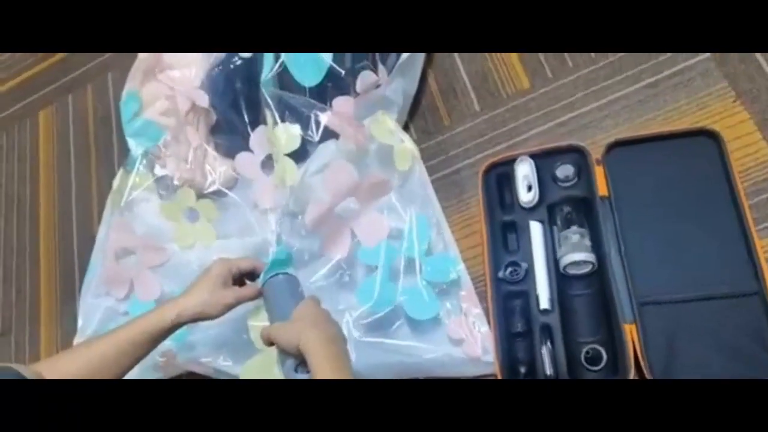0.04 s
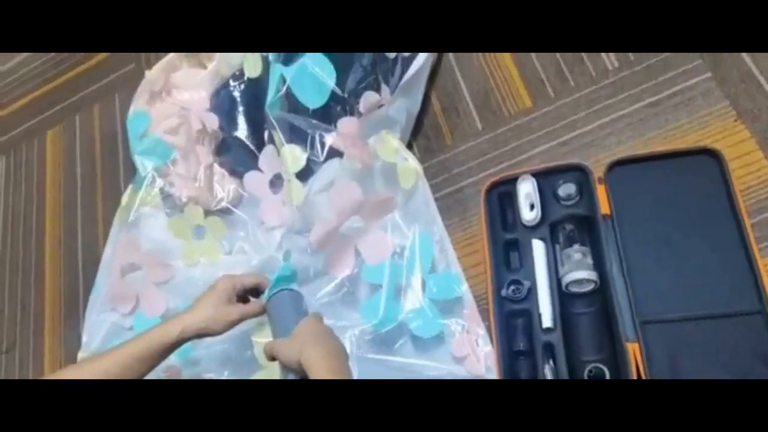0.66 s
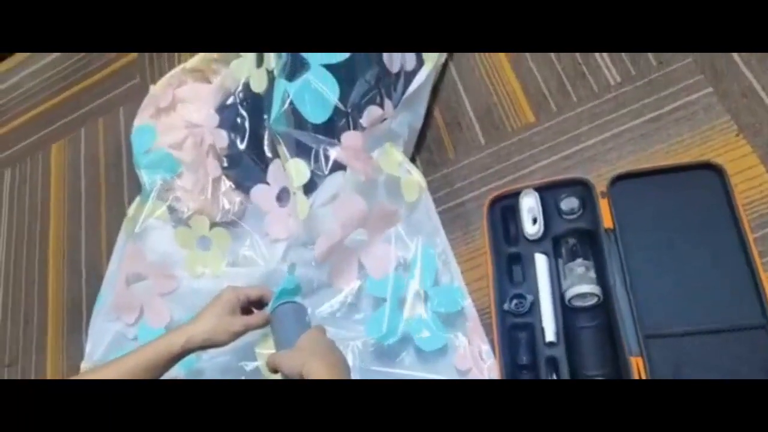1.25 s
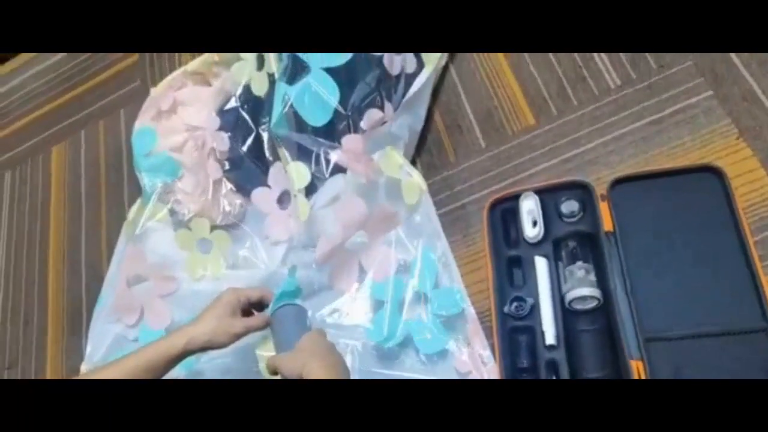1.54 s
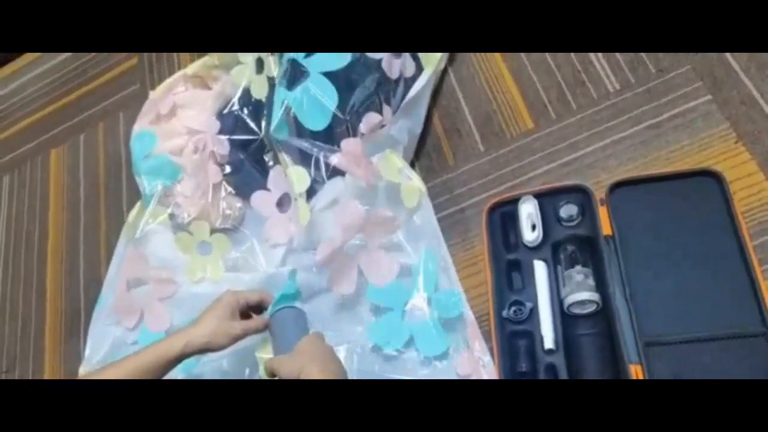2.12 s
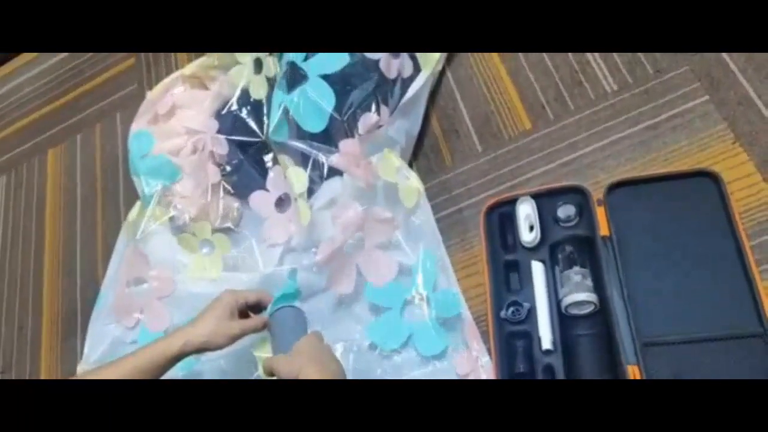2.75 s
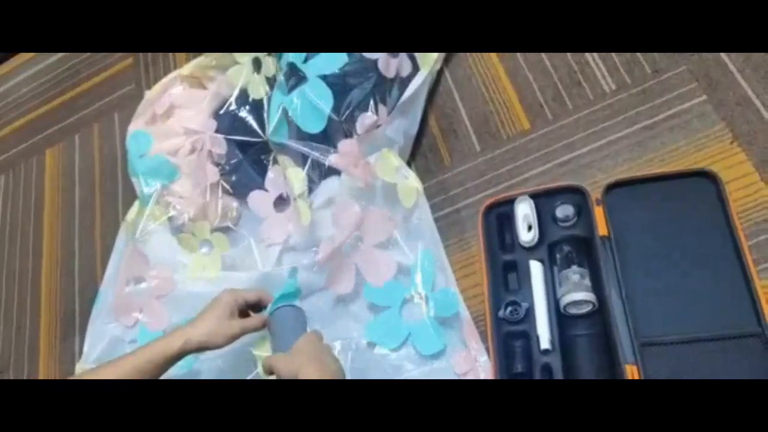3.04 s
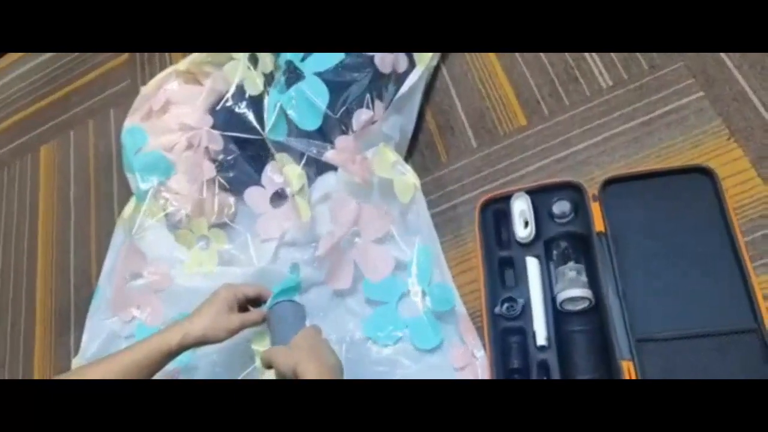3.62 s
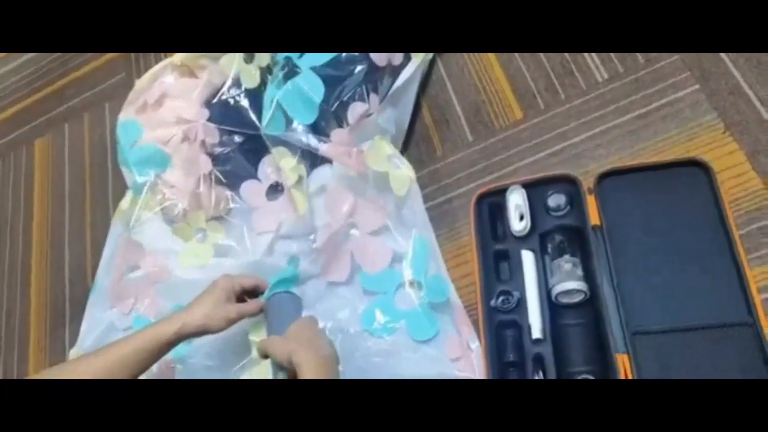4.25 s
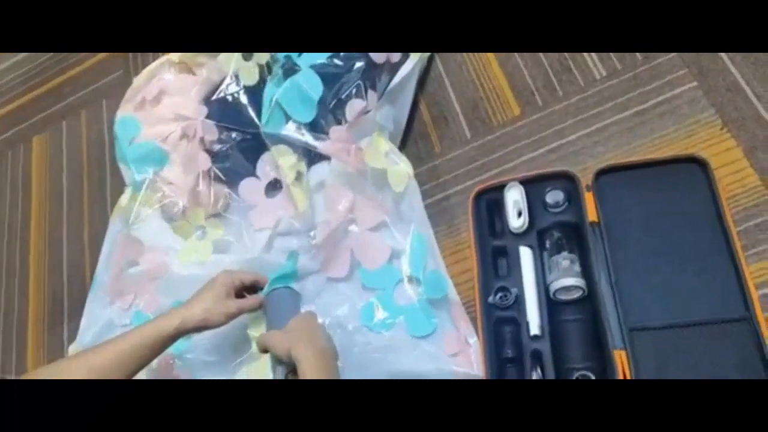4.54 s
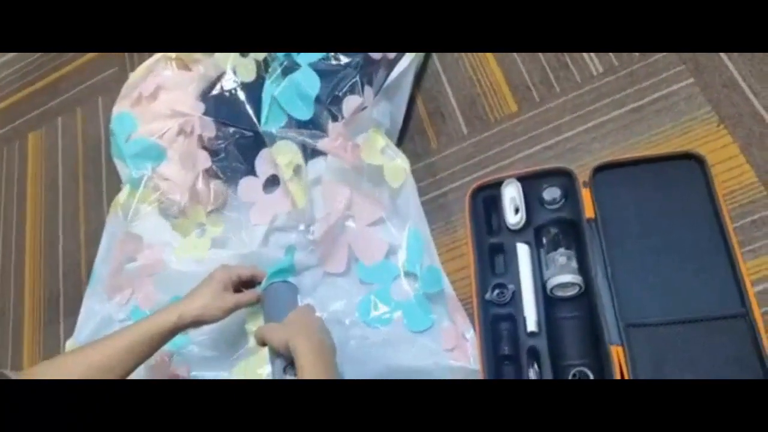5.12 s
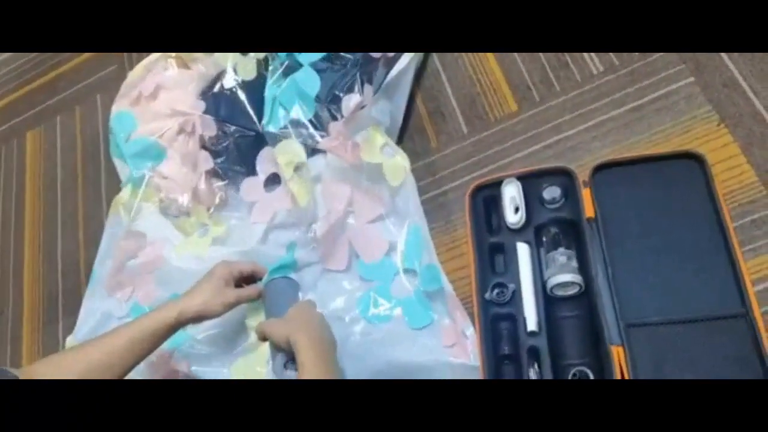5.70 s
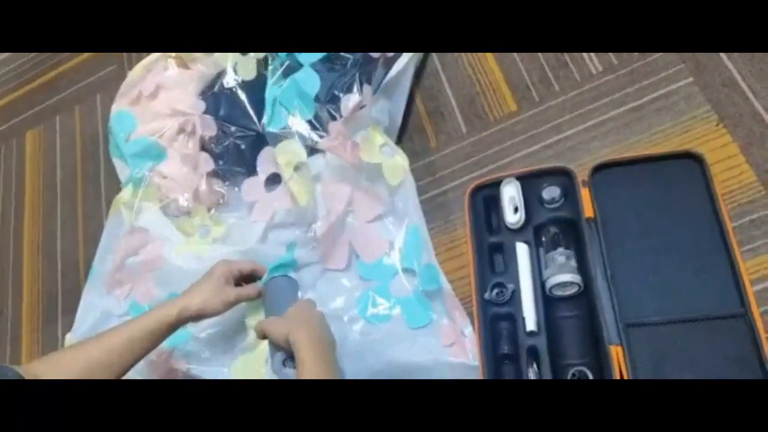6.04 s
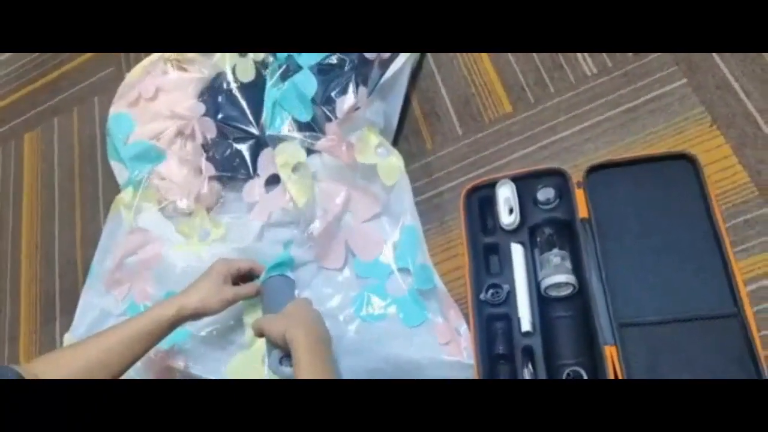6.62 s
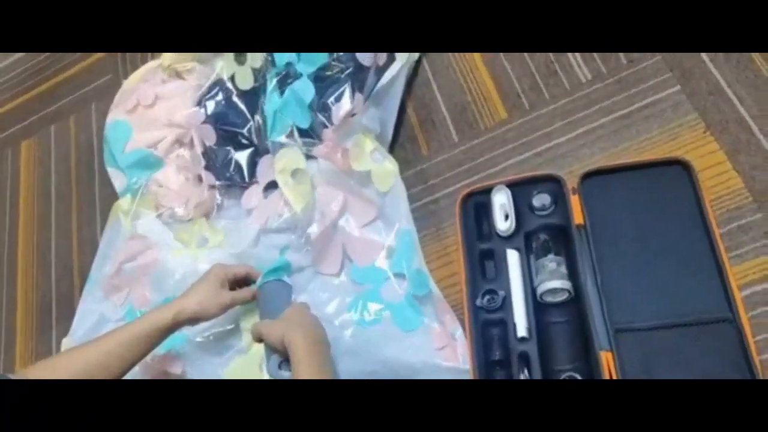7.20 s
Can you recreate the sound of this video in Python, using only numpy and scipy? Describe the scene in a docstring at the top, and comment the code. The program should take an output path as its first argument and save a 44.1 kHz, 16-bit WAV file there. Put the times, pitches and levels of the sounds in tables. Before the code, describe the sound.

A handheld electric vacuum pump runs throughout, drawing air from a plastic storage bag with a bright hiss and a steady rush. A raspy leak at the nozzle fades after about two seconds, while a high motor whine grows and then holds, easing slightly near the end. The hiss shifts subtly in colour. It is heard close up indoors, over a faint rumble and a soft hand bump midway.

```python
"""A bright hiss and a rush of air: a handheld electric pump is emptying a plastic storage bag on carpet.
Air hisses through the bag's valve and rushes out of the pump, whose fan turns about 600 times a second.
As the nozzle seals, a raspy leak fades and the whine of a ball bearing grows.
Close echoes colour the hiss as the grip shifts. Mains hum, a low rumble and soft bumps lie underneath."""
import sys
import numpy as np
from scipy import signal
from scipy.fft import rfft, irfft, next_fast_len
from scipy.io import wavfile
from scipy.ndimage import map_coordinates

SR = 44100
rng = np.random.default_rng(int(sys.argv[2]) if len(sys.argv) > 2 else 0)


def persist_wave(psi):
    """Save psi, clipped to +-1, as 16-bit WAV."""
    counts = np.round(np.clip(psi, -1, 1) * 32767).astype(np.int16)
    wavfile.write(sys.argv[1], SR, np.atleast_2d(counts).T)


N = 328986
TIME = np.arange(N) / SR
SIZE = next_fast_len(N)
FREQS = np.maximum(np.fft.rfftfreq(SIZE, 1 / SR), 1)

# Airflow, before each source adds its own offset: time_s, jet_db, gap_db, rush_db
AIRFLOW = [(0, -29.5, -28, -33.5), (1.3, -29.5, -29.5, -32.5), (2.6, -29.5, -28.7, -32),
           (3.3, -31.5, -28, -33), (4.7, -30.5, -29.5, -33), (5.6, -31, -30.5, -32),
           (7.46, -29.5, -28.5, -33.5)]
# Tone colours of the valve's jet, its gap, the pump's intake and its outflow: pitch_hz, relative_db
JET_COLOUR = [(3500, -25.5), (5000, -21.5), (6000, -5.5), (6600, -4.5), (7000, -0.5), (7400, -0.5),
              (8000, 1), (9000, -12.5)]
GAP_COLOUR = [(3000, -28), (4200, -7.5), (4900, -3), (5500, -0.5), (6200, -0.5), (6800, -4), (8000, -13.5)]
INTAKE_COLOUR = [(100, -10.5), (170, -2.5), (230, 6.5), (320, 3.5), (450, -1.5), (700, -1.5), (900, 3.5),
                 (1100, 4), (1400, -10.5), (2500, -30.5)]
RUSH_COLOUR = [(700, -41.5), (1050, -16), (1230, -2.5), (1450, -1), (2000, -1.5), (2280, -2.5),
               (2480, -6.5), (2850, -3), (3200, -0.5), (3900, 1), (4700, -2), (6500, -17.5)]
# Hollow rings of the plastic housing: pitch_hz, width_hz, relative_to_rush_db
HOUSING_RINGS = [(2484, 200, -10), (2669, 100, -14), (2967, 190, -14.5)]
# Rings of the outlet duct: pitch_hz, width_hz, relative_to_whine_db
DUCT_RINGS = [(1553, 105, -9), (1812, 55, -11)]
# The whine creeps up as the bag empties and the motor speeds up: time_s, pitch_hz
WHINE_PITCH = [(0, 1555), (.7, 1556), (2.0, 1562.5), (4.2, 1564.5), (5.8, 1565), (7.0, 1566.5),
               (7.46, 1571)]
# The whine and the tone at three times shaft speed grow, then ease: time_s, whine_db, third_db
MOTOR_LEVELS = [(0, -46, -48.5), (1.45, -45, -48), (1.66, -39, -47), (1.79, -34, -48), (2.05, -35.5, -39),
                (2.5, -31.5, -39), (4.1, -34, -38.5), (5.1, -35, -39.5), (6.25, -36, -40.5),
                (6.7, -39, -42), (7.46, -38, -44.5)]
# The shaft's hum comes and goes: time_s, level_db
SHAFT_HUM = [(0.0, -43), (0.04, -42), (0.21, -63), (0.7, -49), (0.85, -60), (1.18, -46.5), (1.33, -66),
             (2.06, -72), (2.3, -54), (2.66, -69.5), (3.39, -53), (3.59, -63.5), (4.3, -43), (6.23, -43),
             (6.4, -53), (6.98, -45), (7.13, -57), (7.46, -44)]
# Weak tones of the fan: multiple_of_shaft_speed, level_db
FAN_TONES = [(2, -54.5), (5, -48.5), (6, -48.5), (10, -44.5)]
# Air rasping past the nozzle's rim: pitch_hz, width_hz, level_db
RIM_LEAKS = [(2980, 260, -41), (3325, 230, -45), (3980, 340, -41), (4494, 350, -44.5), (6550, 470, -41)]
# Breathy notes of the valve: start_s, end_s, pitch_hz, peak_db
VALVE_NOTES = [(2.9, 5.305, 5530, -38.5), (3.2, 4.5, 7380, -37), (5.6, 7.9, 7420, -38.5)]
# How strongly the air noise flickers: pitch_hz, depth_db
FLICKER_DEPTH = [(200, 3.5), (600, 3), (1000, 3.5), (1500, 2.5), (2200, 2.5), (3300, 3), (4500, 3),
                 (5800, 1.94), (8000, 1.15)]
# Brief dips in the sound: time_s, low_middle_change_db, air_change_db
DIPS = [(1.40, -12, 1), (1.515, -1, -3.5), (1.605, -2, -5), (1.67, -10, -3), (1.79, -8, -0.5),
        (1.85, -1, -1), (3.27, -6, 1)]
# Echoes off the bag, hand and floor, moving with the grip: time_s, delay_ms, share_reflected
BAG_BOUNCE = [(0, 0.38, 0), (1.2, 0.4, .03), (2.1, .37, 0.087), (2.9, .35, .0), (4.2, .375, 0.12),
              (5.6, 0.35, 0.086), (7.46, 0.45, .16)]
HAND_BOUNCE = [(0, .66, 0.072), (1, .67, 0.021), (2.3, .65, .2), (2.8, .55, .07), (5.2, .53, .09),
               (7.46, 0.55, 0.026)]
FLOOR_BOUNCE = [(0, 1.78, 0.071), (1.8, 1.72, 0.1), (2.4, 1.53, 0.07), (4.4, 1.46, 0.079),
                (6.001, 1.6, .04), (7.46, 1.55, 0.16)]
# Rumble of the room and of handling: time_s, level_db
RUMBLE_LEVEL = [(0, -52.5), (.8, -59), (1.25, -51), (2.05, -60), (2.45, -53.5), (3.95, -52), (4.35, -59),
                (5.1, -57), (5.6, -67), (6.25, -52.5), (7.46, -62)]
# Tone colour of that rumble: pitch_hz, relative_db
RUMBLE_COLOUR = [(15, -22.5), (35, -10.5), (50, -2), (110, 0), (170, -8.5), (240, -6), (400, -16.5),
                 (900, -27)]
# Hum of the mains power: pitch_hz, level_db
MAINS_TONES = [(49.5, -65.5), (99, -61), (198, -63.5)]
# The hand bumps the pump: start_s, level_db
HAND_BUMPS = [(3.765, -47), (3.915, -33.5)]


def valve_hiss():
    """A thin jet hisses through the valve, its gap adds a lower band, and a draught enters the pump."""
    jet_db, gap_db, _ = curves(AIRFLOW)
    jet = from_db(jet_db + 2.5 + 0.29 * drift(2.4)) * noise(JET_COLOUR)
    gap = from_db(gap_db + 0.4 * drift(2.5)) * noise(GAP_COLOUR)
    draught = from_db(-51 + 1.8 * drift(18)) * noise(INTAKE_COLOUR)
    # the wobbling fan stirs a rough band around the shaft's hum
    hum_db, = curves(SHAFT_HUM)
    stirred = from_db(hum_db - 10) * ring(600, width_hz=200)
    return jet + gap + draught + stirred


def exhaust_rush():
    """Air rushes through the housing and rings in the outlet duct, which also cancels one narrow band."""
    _, _, rush_db = curves(AIRFLOW)
    whine_db, _ = curves(MOTOR_LEVELS)
    air = from_db(rush_db - 0.34) * noise(RUSH_COLOUR)
    for hz, width_hz, db in HOUSING_RINGS:
        air += from_db(rush_db + db) * ring(hz, width_hz)
    for hz, width_hz, db in DUCT_RINGS:
        air += from_db(whine_db + db) * ring(hz, width_hz)
    notch_hz, notch_width_hz = 1734, 210
    notch = signal.iirnotch(notch_hz, notch_hz / notch_width_hz, fs=SR)
    hollow = signal.lfilter(*notch, air)
    notch_depth = np.clip((whine_db + 47) / 10, 0, 1)  # deeper as the whine grows
    return air + notch_depth * (hollow - air)


def motor():
    """The bearing whines, the unbalanced shaft hums and the fan adds tones, all tied to one speed."""
    ball_passes_per_turn = 2.5805
    whine_hz, = curves(WHINE_PITCH)
    shaft_hz = whine_hz / ball_passes_per_turn
    whine_db, third_db = curves(MOTOR_LEVELS)
    hum_db, = curves(SHAFT_HUM)
    whine = from_db(whine_db + drift(10)) * tone(whine_hz, shake=0.23, shake_hz=17)
    hum = from_db(hum_db - 0.2) * tone(shaft_hz, shake=0.34, shake_hz=76)
    third = from_db(third_db) * tone(3 * shaft_hz, shake=0.36, shake_hz=27)
    fan = sum(from_db(db) * tone(multiple * shaft_hz, shake=1, shake_hz=20) for multiple, db in FAN_TONES)
    return whine + hum + third + fan


def leak_and_notes():
    """Air leaks past the nozzle's rim until it seals; later the valve sings in narrow bands."""
    sealed_at_s, sealing_s = 2.4, 0.74
    unsealed = np.clip((sealed_at_s - TIME) / sealing_s, 0, 1)
    air = unsealed * sum(from_db(db) * ring(hz, width_hz) for hz, width_hz, db in RIM_LEAKS)
    for start_s, end_s, hz, db in VALVE_NOTES:
        progress = np.clip((TIME - start_s) / (end_s - start_s), 0, 1)
        air += from_db(db) * np.sin(np.pi * progress) * ring(hz, width_hz=250)
    return air


def shimmer(air):
    """Narrow bands of the air noise flicker, and slower ripples pass through it."""
    hz, times, bands = signal.stft(air, SR, nperseg=1024)
    heard = hz < 8040
    hz = hz[heard]
    flicker = 0.72 * patches(hz, times, width_hz=95, length_s=0.075)
    flicker += 0.57 * patches(hz, times, width_hz=421.4, length_s=0.028)
    ripple = patches(hz, times, width_hz=100, length_s=0.16)
    # both sink further than they rise
    flicker -= 0.5 * np.minimum(flicker, 0) ** 2
    ripple -= 2.2 * np.minimum(ripple, 0) ** 2
    flicker_db = np.interp(hz, *np.transpose(FLICKER_DEPTH))
    ripple_db = np.exp(-(np.log2((hz + 1) / 3100) / 0.65) ** 2)  # strongest near 3100 Hz
    bands[heard] *= from_db(flicker * flicker_db[:, None] + ripple * ripple_db[:, None])
    return signal.istft(bands, SR, nperseg=1024)[1][:N]


def close_echo(air, path, oversample=4):
    """An echo with a moving delay; mixed with the direct sound, it lifts some pitches and cuts others."""
    delay_ms, share = curves(path)
    fine_air = signal.resample_poly(air, oversample, 1)
    read_at = (TIME - delay_ms / 1000) * SR * oversample
    return share * np.interp(read_at, np.arange(len(fine_air)), fine_air)


def dip_low_middle(sound, centre_hz=640, half_width_octaves=0.67):
    """The lower middle of the sound drops away for brief moments."""
    band_shape = 1 / (1 + (np.log2(FREQS / centre_hz) / half_width_octaves) ** 4)
    band = irfft(rfft(sound, SIZE) * band_shape, SIZE)[:N]
    gain = from_db(dips_db(column=1, length_s=0.016))
    return sound + (gain - 1) * band


def hand_bump(start_s, hz=97, length_s=0.011):
    """A soft push of the hand swells and dies within a few cycles."""
    age_s = np.maximum(TIME - start_s, 0)
    rise = 2 * age_s / length_s
    return rise * np.exp(1 - rise) * np.sin(2 * np.pi * hz * age_s)


def background():
    """The room rumbles, the mains hums and the hand bumps the pump."""
    rumble_db, = curves(RUMBLE_LEVEL)
    rumble = from_db(rumble_db + 4.7 * drift(12)) * noise(RUMBLE_COLOUR)
    mains = sum(from_db(db) * tone(hz, shake=0.96, shake_hz=3.4) for hz, db in MAINS_TONES)
    bumps = sum(from_db(db) * hand_bump(start_s) for start_s, db in HAND_BUMPS)
    return rumble + mains + bumps


def from_db(db):
    """Turn decibels into a gain."""
    return 10 ** (np.asarray(db) / 20)


def unit_power(x):
    """Scale a signal to an average power of 1."""
    return x / np.sqrt(np.mean(np.abs(x) ** 2) + 1e-20)


def curves(table):
    """Join a table's points with straight lines: one curve for each column after the time."""
    times, *columns = np.transpose(table)
    return [np.interp(TIME, times, column) for column in columns]


def dips_db(column, length_s):
    """A level curve with a short bell shape at each time in DIPS."""
    return sum(row[column] * np.exp(-((TIME - row[0]) / length_s) ** 2) for row in DIPS)


def spin(hz):
    """A point circling at a steady or moving pitch; its real part is a pure tone."""
    return np.exp(2j * np.pi * np.cumsum(hz * np.ones(N)) / SR)


def flutter(rate_hz):
    """A random shake of strength and phase, changing about rate_hz times a second."""
    white = rng.standard_normal(SIZE) + 1j * rng.standard_normal(SIZE)
    roll_off = 1 + (np.fft.fftfreq(SIZE, 1 / SR) / rate_hz) ** 2
    return unit_power(np.fft.ifft(white / roll_off)[:N])


def drift(rate_hz, step=40):
    """A slow random wander of about 1 either way, made by smoothing coarse noise twice."""
    memory = np.exp(-2 * np.pi * step * rate_hz / SR)
    coarse = rng.standard_normal(N // step + 2002)
    slow = signal.lfilter([1], [1, -2 * memory, memory ** 2], coarse)[2000:]  # let the filter settle
    return np.interp(np.arange(N) / step, np.arange(len(slow)), unit_power(slow))


def patches(hz, times, width_hz, length_s, glide_hz_per_s=89.8):
    """Smooth random hills and dips over pitch and time, gliding upward."""
    hz, times = np.meshgrid(hz, times, indexing="ij")
    where = [(hz - glide_hz_per_s * times) / width_hz, times / length_s]
    return map_coordinates(rng.standard_normal((512, 512)), where, order=3, mode="grid-wrap")


def noise(colour):
    """White noise shaped to a tone colour."""
    hz, db = np.transpose(colour)
    gain = from_db(np.interp(np.log(FREQS), np.log(hz), db))
    white = rng.standard_normal(SIZE)
    return unit_power(irfft(rfft(white) * gain, SIZE)[:N])


def ring(hz, width_hz):
    """Air noise ringing around one pitch."""
    return unit_power((spin(hz) * flutter(width_hz / 2)).real)


def tone(hz, shake, shake_hz):
    """A tone roughened by random shaking."""
    return unit_power((spin(hz) * (1 + shake * flutter(shake_hz))).real)


def scene():
    """The air surges and bounces off what is near, joined by motor and background; both channels match."""
    surge = from_db(0.6 * drift(39) + dips_db(column=2, length_s=0.011))
    air = shimmer(valve_hiss() + exhaust_rush() + leak_and_notes())
    air += sum(close_echo(air, path) for path in (BAG_BOUNCE, HAND_BOUNCE, FLOOR_BOUNCE))
    mix = motor() + dip_low_middle(surge * air + background())
    return np.array([mix, mix])


def record(dry):
    """The microphone loses the treble steeply above 8000 Hz."""
    loss_db = np.clip((FREQS - 8000) * 0.3, 0, 90)
    return irfft(rfft(dry, SIZE) * from_db(-loss_db), SIZE)[:, :N]


dry = scene()
out = record(dry)
persist_wave(out)
```